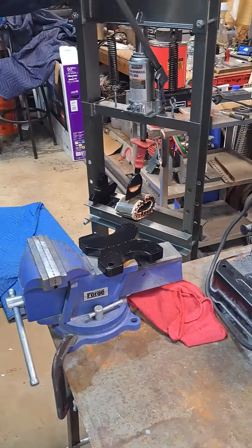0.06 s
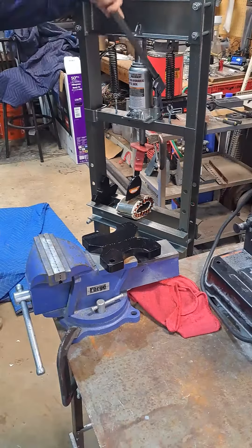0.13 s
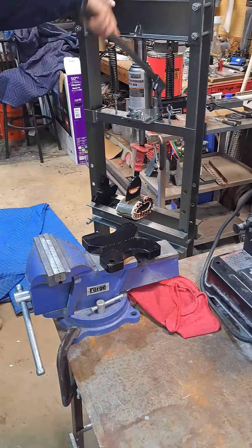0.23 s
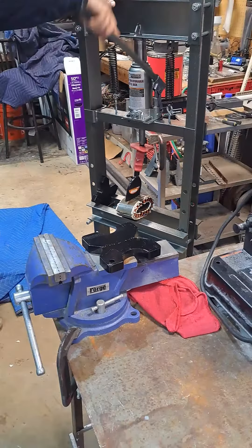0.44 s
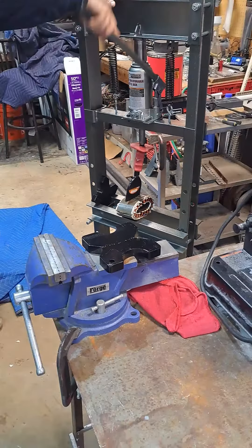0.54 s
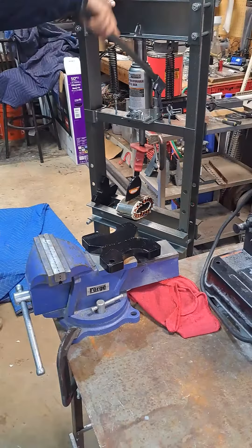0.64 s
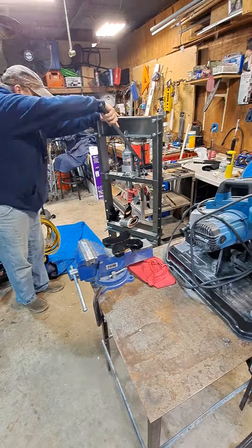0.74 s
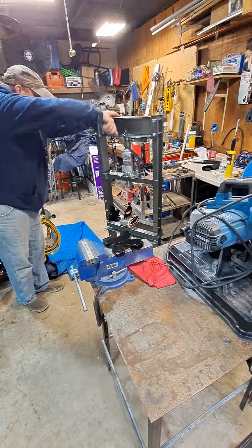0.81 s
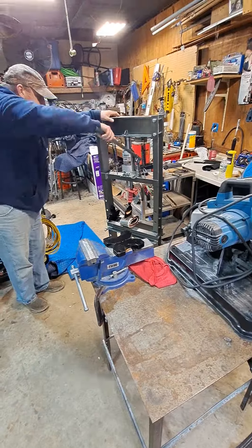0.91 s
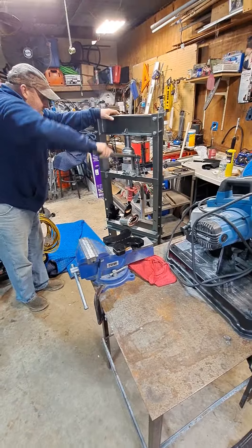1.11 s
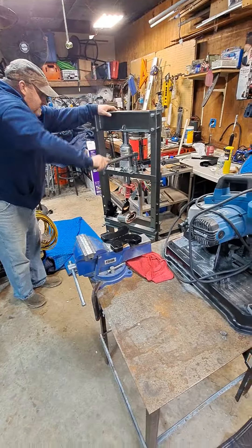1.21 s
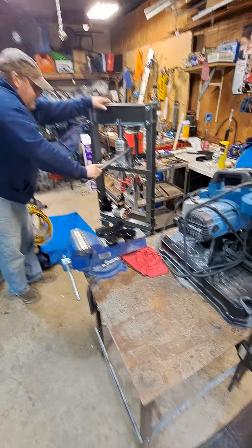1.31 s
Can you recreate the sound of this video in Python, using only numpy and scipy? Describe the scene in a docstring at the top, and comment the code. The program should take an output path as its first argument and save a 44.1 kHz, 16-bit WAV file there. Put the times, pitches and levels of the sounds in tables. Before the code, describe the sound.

Two hard metallic clanks from a hand-pumped shop press, with light rattling clicks around them

```python
"""The loose handle of a bottle jack in a steel shop press clanks twice against its stop and rings the frame.
Each clank is a burst of noise coloured by a resonant spectrum; decaying sinusoids are the modes it excites.
Around the clanks the handle ticks, as coloured noise with short tones, and scrapes into each clank, as sparse
random grains. A dense tail of band-wise decaying noise is the cluttered workshop; shaped noise is its quiet
rumble and air."""
import sys
import numpy as np
from scipy import signal
from scipy.fft import rfft, irfft, next_fast_len
from scipy.io import wavfile

SR = 44100
rng = np.random.default_rng(int(sys.argv[2]) if len(sys.argv) > 2 else 0)


def master(y):
    """Save y as 16-bit WAV."""
    cut = np.clip(np.atleast_2d(y).T, -1, 1)
    pcm = np.round(cut * 32767)  # scale
    wavfile.write(sys.argv[1], SR, pcm.astype(np.int16))


N = 59535
T = np.arange(N) / SR
SIZE = 2 * next_fast_len(N)
FREQS = np.maximum(np.arange(SIZE // 2 + 1) * SR / SIZE, 1)
TOP_HZ = 15800


def amp(db):
    """Level law: 20 dB is a factor of ten in amplitude."""
    return 10 ** (np.asarray(db) / 20)


def curve(points, at=FREQS):
    """Logarithmic frequency scale: join (Hz, value) points by straight lines on it."""
    hz, value = np.array(points).T
    return np.interp(np.log(at), np.log(hz), value)


def colour(x, db):
    """Minimum-phase filtering: a folded cepstrum makes a causal filter with the given gain."""
    cepstrum = irfft(np.log(amp(db)))
    cepstrum[1:SIZE // 2] *= 2
    cepstrum[SIZE // 2 + 1:] = 0
    response = np.exp(rfft(cepstrum, SIZE))
    return irfft(rfft(x, SIZE) * response)[..., :N]


def pan(pair, points):
    """Interaural level difference: tilt a stereo pair left or right, by frequency."""
    half_db = curve(points) / 2
    return np.array([colour(pair[0], half_db), colour(pair[1], -half_db)])


def convolve(a, b):
    """Convolution theorem: multiply spectra to pass a sound through an impulse response."""
    return irfft(rfft(a, SIZE) * rfft(b, SIZE))[..., :N]


def fade(start, t60, rise):
    """Exponential damping: a quick rise, then a fall of 60 dB in t60 seconds."""
    age = np.maximum(T - start, 0)
    return (1 - np.exp(-age / rise)) * amp(-60 * age / t60)


RESONANCE_OCTAVES = 0.17  # half-width at half the dB height


def resonance(hz, db):
    """Resonance: a rounded bump in a spectrum, in dB."""
    return db / (1 + (np.log2(FREQS / hz) / RESONANCE_OCTAVES) ** 4)


def crunch(envelope, evenness, count=4, size=41):
    """Dense impact noise: unit energy, a followed envelope and a spectrum more even than chance."""
    x = rng.standard_normal(len(envelope)) * envelope
    for _ in range(count):
        spectrum = rfft(x)
        flatter = spectrum / (np.abs(spectrum) + 1e-9) ** min(evenness, 1)
        x = irfft(flatter, len(envelope))
        local_energy = np.convolve(x ** 2, np.hanning(size), "same")
        x = x * envelope / np.sqrt(local_energy + 1e-24)
    return x / np.sqrt(np.sum(x ** 2))


BLOW_EVENNESS, RATTLE_T60_S = 0.55, 0.045


def contact(when, rise, fall, rattle=0, size=4096):
    """Impact excitation: a brief crunch of steel of unit energy, with a share of rattle after it."""
    first = max(int(when * SR) - size // 8, 0)
    age = T[first:first + size] - when
    blow = np.exp(np.minimum(age / rise, -age / fall))
    after = fade(when, RATTLE_T60_S, fall)[first:first + size]
    blow = blow / np.linalg.norm(blow)
    after = rattle * after / np.linalg.norm(after)
    out = np.zeros(N)
    out[first:first + size] = crunch(np.hypot(blow, after), BLOW_EVENNESS)
    return out


CHATTER_DB, CHATTER_S = 3.5, 0.007  # random spread and spacing of the flutter's levels
MODE_RISE_S = 0.0044


def mode(when, hz, t60, db):
    """Modal vibration: one damped sine, fluttering as loose parts touch, its phase differing by side."""
    apart = min(hz / 1500, 1) * rng.choice([-1, 1]) * np.pi / 4  # grows with pitch up to 1500 Hz
    phase = rng.uniform(0, 2 * np.pi) + apart * np.array([[1], [-1]])
    steps = rng.standard_normal(size=1024)
    flutter = np.interp(T, np.arange(len(steps)) * CHATTER_S, amp(CHATTER_DB * steps))
    return amp(db) * flutter * fade(when, t60, MODE_RISE_S) * np.sin(2 * np.pi * hz * T + phase)


DIFFUSE_ABOVE_HZ = 440


def diffuse(pair):
    """Diffuse-field coherence: two noises share their bass but keep unrelated treble."""
    apart = 1 / (1 + (DIFFUSE_ABOVE_HZ / FREQS) ** 2)
    mid, side = rfft(pair, SIZE) * np.sqrt([1 - apart / 2, apart / 2])
    return irfft(np.array([mid + side, mid - side]))[:, :N]


# Spectrum of the background air: frequency_hz, relative density_db [dB per Hz]
AIR_COLOUR = [(20, -26.5), (60, -15.5), (120, -14), (250, -10.5), (500, -21), (950, -20), (1300, -18.5),
              (1800, -36), (3200, -32.5), (5200, -27.5), (9000, -40), (15000, -36.5)]
# Spectrum of the low rumble: frequency_hz, relative density_db [dB per Hz]
RUMBLE_COLOUR = [(15, -22), (28, -12), (43, 1), (60, -8.5), (85, -5), (130, -9.5), (200, -19), (400, -33),
                 (1000, -87)]
# Swell of the rumble: time_s, level_db [dB relative to RUMBLE_DB]
RUMBLE_SWELL = [(0, 9), (.13, -5.5), (.2, 6.5), (.3, 12.5), (.42, 3), (.5, -2.5), (.62, 6.5), (.8, -3.5),
                (.87, 4), (.94, 11), (1.05, 0), (1.2, 2.5), (1.35, -12)]
AIR_DB, RUMBLE_DB = -58.5, -61.5


def background():
    """Filtered random noise: a swelling low rumble in both channels and faint diffuse air."""
    air = colour(diffuse(rng.standard_normal((2, N))), curve(AIR_COLOUR))
    rumble = colour(rng.standard_normal(N), curve(RUMBLE_COLOUR))
    swell = amp(RUMBLE_DB + np.interp(T, *np.array(RUMBLE_SWELL).T))
    return amp(AIR_DB) * air / np.std(air) + swell * rumble / np.std(rumble)


# Reverberation time of the workshop: frequency_hz, t60_s
ROOM_T60 = [(150, 0.28), (500, 0.36), (1200, 0.3), (3000, 0.25), (6000, 0.22), (10000, 0.16), (16000, 0.2)]
# Stereo balance of the room: frequency_hz, left_minus_right_db
ROOM_PAN = [(200, -2), (500, 1), (1000, -5.5), (2000, 0), (3600, -5), (6500, -7), (9700, 3), (13000, -3)]
ROOM_DB, ROOM_EVENNESS = -27, 0.16
ROOM_RISE_S, BASS_RISE_S = 0.00033, 0.016  # the second is added fully in the deep bass


def workshop(x, count=10):
    """Reverberation: dense echoes from benches and shelves; the bass builds more slowly."""
    decay = amp(-60 * T / curve(ROOM_T60, 3000)) + 1e-6
    echoes = np.array([crunch(decay, ROOM_EVENNESS) / decay for _ in range(2)])
    spectrum = rfft(diffuse(echoes / np.std(echoes)), SIZE)
    centres = np.geomspace(100, TOP_HZ, count)
    tail = 0
    for hz, weights in zip(centres, np.eye(count)):
        band_gain = np.interp(np.log(FREQS), np.log(centres), weights)
        band = irfft(spectrum * band_gain)[:, :N]
        rise = ROOM_RISE_S + BASS_RISE_S / (1 + (hz / 900) ** 2)
        tail = tail + band * fade(0, curve(ROOM_T60, hz), rise)
    return amp(ROOM_DB) * pan(convolve(x, tail), ROOM_PAN)


# Colour of the direct sound: frequency_hz, gain_db
DIRECT_COLOUR = [(200, -14), (700, -5.5), (2000, -8.5), (4000, -1.5), (12000, 0.5)]
# Stereo balance of the direct sound: frequency_hz, left_minus_right_db
DIRECT_PAN = [(300, -8.5), (2000, 7), (3600, -12), (6500, -1), (9700, 16.5), (13000, -8), (16000, 8.5)]
RIGHT_LAG_S = 0.00013


def direct_path(x):
    """Arrival-time difference: the coloured direct sound reaches the right channel later."""
    left = colour(x, curve(DIRECT_COLOUR))
    delay = np.exp(-2j * np.pi * FREQS * RIGHT_LAG_S)
    right = irfft(rfft(left, SIZE) * delay)[:N]
    return pan([left, right], DIRECT_PAN)


# Brief treble changes: time_s, gain_db
TREBLE_GAIN = [(.732, 5.5), (.745, -7.5), (.765, -3), (.779, 9)]
DIP_ABOVE_HZ = 2600


def treble_dip(x):
    """Time-varying high-band gain: before the second clank the treble lifts, dips and lifts again."""
    high_pass = signal.butter(2, DIP_ABOVE_HZ, "high", fs=SR, output="sos")
    treble = signal.sosfiltfilt(high_pass, x)
    gain_db = np.interp(T, *np.array(TREBLE_GAIN).T, left=0, right=0)
    return x + treble * (amp(gain_db) - 1)


# Handle sliding in its socket: start_s, length_s, level_db [before the spectrum's gain]
SCRAPES = [(0.134, 0.055, -43), (0.798, 0.12, -40.5)]
# Spectrum of the scrape: frequency_hz, density_db [dB per Hz, 5 dB below the one used]
SCRAPE_COLOUR = [(150, -0.5), (800, -3), (1800, -6), (3200, -7.5), (4200, -4.5), (5500, -7.5), (7000, -12),
                 (9000, -14), (15500, -26)]
GRAINS_PER_S = 580


def scrapes():
    """Stick-slip friction: random grains as the handle slides around the time of each clank."""
    slips = rng.random(N) < GRAINS_PER_S / SR
    grains = slips * rng.standard_normal(N) * np.sqrt(SR / GRAINS_PER_S)
    pressure = sum(amp(db) * ((T > start) & (T < start + length)) for start, length, db in SCRAPES)
    return colour(grains * pressure, curve(SCRAPE_COLOUR) + 5)


# Modes of the handle tube: pitch_hz, t60_s, level_db [relative to each tick's handle_ring_db]
HANDLE_MODES = [(1927, 0.39, -1.5), (2106, 0.28, 0), (2115, 0.21, -5), (2157, 0.38, -2.5),
                (2960, 0.11, -2.5)]
# Modes of the jack body: pitch_hz, t60_s, level_db [relative to the tick's level_db + body_db]
JACK_MODES = [(607, 0.21, -63.5), (830, .22, -60.5), (1026, 0.18, -65.5)]


def handle():
    """Modal excitation: each tick rings the handle tube; the heaviest also rings the jack body."""
    when, db, _, body_db, *_ = max(TICKS, key=lambda tick: tick[1] + tick[3])
    knock = sum(mode(when, hz, t60, db + body_db + mode_db) for hz, t60, mode_db in JACK_MODES)
    tube = sum(mode(tick[0], hz, t60, mode_db + tick[-1])
               for hz, t60, mode_db in HANDLE_MODES for tick in TICKS)
    return knock + tube


PING_DB, PING_T60_S = -28, 0.014  # level relative to the tick and its resonance


def pings():
    """Local resonance: the struck spot rings briefly, a hard, pitched bite at each tick's start."""
    total = 0
    for when, db, _, _, _, hz, peak_db, direct_db, _ in TICKS:
        tone = fade(when, PING_T60_S, TICK_RISE_S) * np.sin(2 * np.pi * hz * (T - when))
        total = total + amp(PING_DB + db + peak_db + direct_db) * tone
    return total


# Play in handle and linkage: start_s, level_db [relative], fall_s, body_db, treble_db,
# resonance_hz, resonance_db, direct_db [direct sound relative to room feed], handle_ring_db
TICKS = [(.003, 0, 0.0038, 15.5, -16, 2885, 8.5, 0, -42.5),
         (0.1129, 4.5, 0.00058, 17.5, -8.5, 4110, 2, -3.5, -52),
         (0.174, -1.5, 0.0057, -6.5, -11, 5300, -4, -8, -56), (.213, 0, 0.0086, 21, -6, 4000, 1, -7, -62),
         (.225, 6, 0.0028, 21, -5, 4000, -7.5, -8, -56), (0.481, -28.5, 0.0015, 28, -15, 2600, 3.5, 7, -72),
         (0.523, -21, 0.0011, 5, 9, 4880, 8.5, -9.5, -83),
         (0.5865, -4, 0.00035, 7.5, 8, 1980, 3, -6, -47.5),
         (.692, -12.5, 0.0029, 0, 3.5, 6600, -6, -4, -72),
         (0.703, -16, 0.0015, -2, 6, 2006, 19.5, -12, -66),
         (0.7822, -17, 0.00061, 27, -7, 4270, 3, 1.5, -78),
         (0.801, -6.5, 0.0047, 9, -6, 4000, -4, -2.5, -68),
         (0.848, -2.5, .001, 29.5, -6, 5600, 16, -15, -56),
         (1.185, -19.5, 0.0033, -33, -0.5, 3410, -0.5, -3.5, -84),
         (1.224, -16, 0.0012, -19, 9, 4600, 5, -4, -71),
         (1.2664, 0.5, 0.00054, -2.5, 4, 3310, 8, -2.5, -54)]
# Spectrum of steel on steel: frequency_hz, density_db [dB per Hz, before each tick's own gains]
TICK_COLOUR = [(100, -48), (300, -12.5), (700, -21.5), (1400, -17.5), (2200, -8.5), (3600, -6), (5000, -5),
               (7500, -4.5), (9200, -16), (12500, -6), (15500, -19.5)]
TICK_RISE_S, BODY_HZ, BODY_OCTAVES, TREBLE_EDGE_HZ = 0.00013, 820, 0.95, 5900


def ticks():
    """Light impacts as slack is taken up: returns the direct sound and the feed to the room."""
    body = 1 / (1 + (np.log2(FREQS / BODY_HZ) / BODY_OCTAVES) ** 4)
    treble = 1 / (1 + (TREBLE_EDGE_HZ / FREQS) ** 6)
    steel = curve(TICK_COLOUR)
    straight, around = 0, 0
    for when, db, fall, body_db, treble_db, hz, peak_db, direct_db, _ in TICKS:
        spectrum_db = db + steel + body_db * body + treble_db * treble + resonance(hz, peak_db)
        tick = colour(contact(when, TICK_RISE_S, fall), spectrum_db)
        straight = straight + amp(direct_db) * tick
        around = around + tick
    return straight, around


# Modes of the press frame: pitch_hz, t60_s, first_clank_level_db, second_clank_level_db
FRAME_MODES = [(237, 1, -52, -63), (284.8, 0.42, -49, -40.5), (800, 0.16, -27.5, -38),
               (928, 0.3, -28, -34.5), (1253, 0.23, -32, -32.5), (1527, 0.202, -29.5, -47),
               (1975, 0.39, -37, -65), (2673, .19, -28, -31), (2880, 0.24, -28.5, -27.5),
               (3070, 0.12, -47.5, -23), (3874, .1, -21, -39), (4015, 0.13, -14.5, -26),
               (4240, 0.1, -16.5, -22), (5340, 0.16, -43.5, -46), (5910, 0.13, -31, -23.5)]


def frame():
    """Modal excitation: each clank sets the press frame ringing."""
    return sum(mode(clank[0], hz, t60, db)
               for hz, t60, *levels in FRAME_MODES for clank, db in zip(CLANKS, levels))


# Handle hitting its stop: start_s, level_db [relative], rise_s, fall_s,
# rattle_db [relative to the blow], resonance_hz, resonance_db
CLANKS = [(0.2315, 14.5, 0.00098, 0.0011, 0, 3956, 9.5), (0.8565, 13, 0.0011, 0.0012, -2, 3003, 9)]
# Spectrum of each clank, one list per clank: frequency_hz, density_db [dB per Hz, before level_db]
CLANK_COLOURS = [
    [(100, -23), (240, 3), (560, -14), (830, 1.5), (1150, -3), (2700, 2), (3300, -5), (6500, 1),
     (8800, -12.5), (10500, -7), (15500, -10)],
    [(100, -25.5), (280, -3), (560, -11.5), (900, -3), (1250, -3), (2100, -3.5), (4500, 0), (6000, 3),
     (8800, -11), (10500, -7), (15500, -11)],
]


def clanks():
    """Forced impact: the handle strikes its stop and the linkage rattles out in a dense, short ring."""
    total = 0
    for (when, db, rise, fall, rattle_db, hz, peak_db), points in zip(CLANKS, CLANK_COLOURS):
        blow = contact(when, rise, fall, amp(rattle_db))
        total = total + colour(blow, db + curve(points) + resonance(hz, peak_db))
    return total


def scene():
    """Superposition: direct sound, room tail, ringing metal and background add together."""
    strokes = clanks() + scrapes()
    straight, around = ticks()
    direct = direct_path(strokes + straight + pings())
    reverberant = workshop(strokes + around)
    ringing = pan(frame() + handle() + background(), ROOM_PAN)
    return treble_dip(direct + reverberant + ringing)


def record(dry):
    """Band limiting: a steep low-pass filter removes the top of the spectrum."""
    low_pass = signal.ellip(10, .2, 80, TOP_HZ, fs=SR, output="sos")
    return signal.sosfilt(low_pass, dry)


dry = scene()
out = record(dry)
master(out)
```